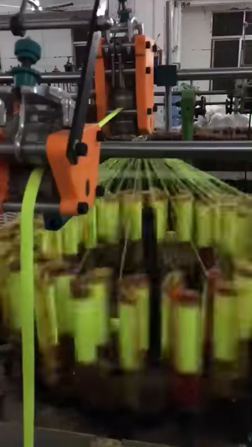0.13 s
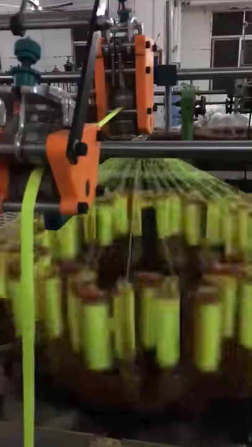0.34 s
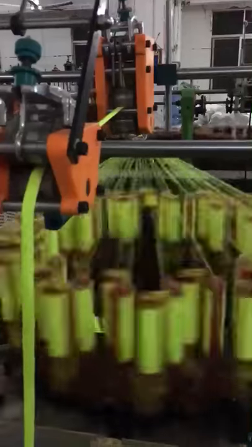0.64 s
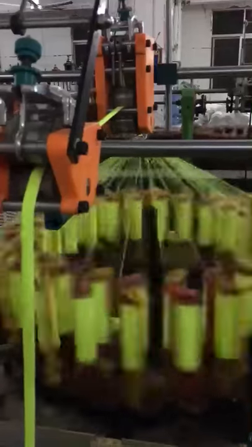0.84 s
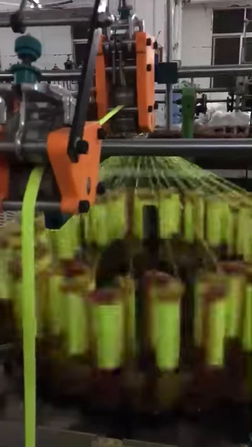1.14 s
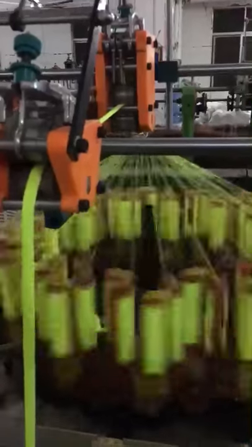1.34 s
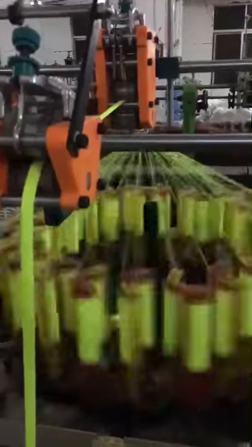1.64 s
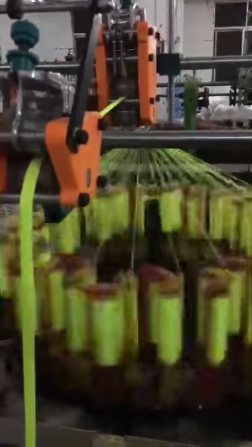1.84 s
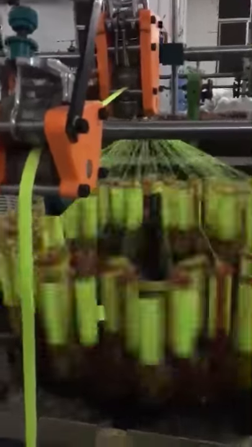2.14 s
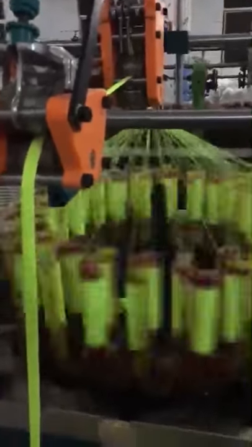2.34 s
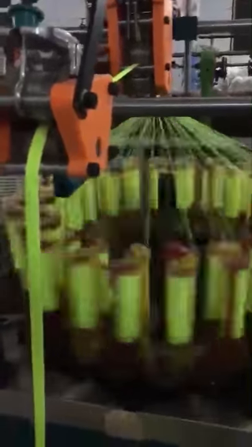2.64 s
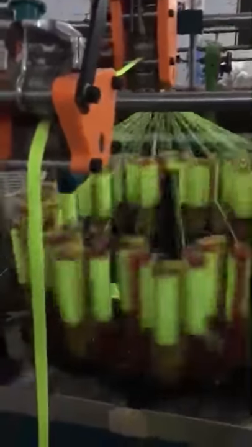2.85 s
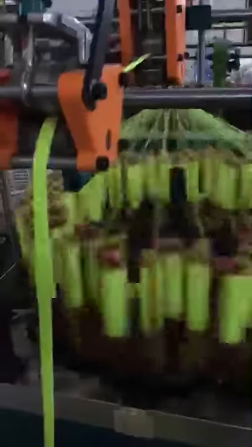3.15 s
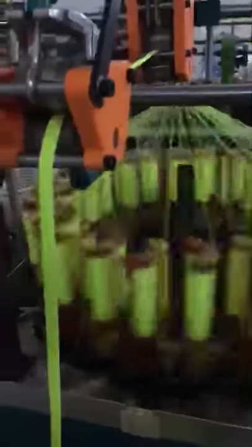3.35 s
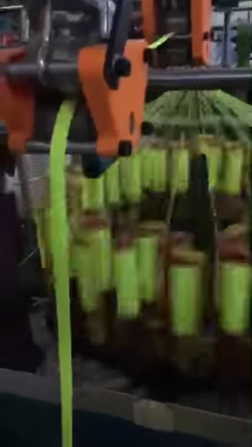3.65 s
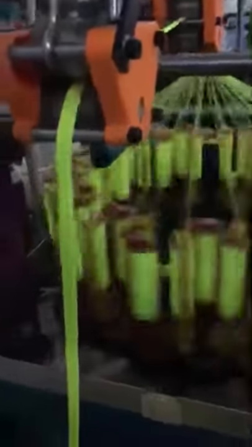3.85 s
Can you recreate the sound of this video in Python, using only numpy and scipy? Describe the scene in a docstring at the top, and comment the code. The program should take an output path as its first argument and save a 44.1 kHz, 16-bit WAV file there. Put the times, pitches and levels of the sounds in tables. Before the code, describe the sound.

A braiding machine runs close by in a reverberant factory hall. Silence until about 0.26 s, then the full roar cuts in at once and holds to the end near 4 s. Countless tiny steel knocks merge into bright, gritty clatter strongest in the upper mids, with fluttering thread hiss, low frame rumble, unevenly swelling drive hum and steady hall din. The treble is dull at the very top.

```python
"""A braiding machine at steady speed in a factory hall, heard from close by.
First a quarter second of silence; then everything cuts in at once and runs to the end.
Random knocks excite steel rings: bobbin carriers circling their track merge into a roar, spindles ring on.
Filtered noise gives the hiss of the threads, the rumble of the frame and the even din of the hall behind;
drifting sines give the hum of the drive and the swelling harmonics of its shaft."""
import sys
import numpy as np
from scipy import signal
from scipy.fft import rfft, irfft
from scipy.io import wavfile

SR = 44100
rng = np.random.default_rng(int(sys.argv[2]) if len(sys.argv) > 2 else 0)


def generate_wav(sig):
    """Save sig (samples, or channels by samples) to the path in sys.argv[1] as 16-bit PCM at SR."""
    pcm = np.round(np.clip(np.atleast_2d(sig).T, -1, 1) * 32767).astype(np.int16)
    wavfile.write(sys.argv[1], SR, pcm)


N = 176400  # samples, 4 s

# Spectrum of the struck steel track and carriers: (frequency [Hz], relative density [dB per Hz])
STEEL_SPECTRUM = [(200, -20), (400, -11.5), (800, -11), (1300, -8), (1800, -4), (2250, -3), (2620, -1),
                  (3200, -2.5), (4100, -4.5), (4500, -7.5), (4900, -13.5), (6000, -7), (7600, -14)]
# Force of the knocks as the load on the carriers varies: (time [s], relative level [dB])
LOAD_CURVE = [(0.3, -18), (0.32, -17), (0.85, -17.5), (0.88, -21.5), (0.95, -15), (0.96, -18.5),
              (2.16, -16.5), (2.38, -19), (2.41, -16.5), (2.44, -17.5), (3.93, -18), (3.95, -18.5)]
# Ringing modes of the spindles: (frequency [Hz], relative level [dB], decay by 60 dB [s])
SPINDLE_MODES = [(356.5, -6, .1), (402.4, -5, 0.13), (419.4, -8.5, 0.17), (1623, -5, 0.071),
                 (1780, -3.5, 0.064), (1888, 1, .06), (1960, -3, 0.061), (2115, -6, .06), (2390, -7.5, .04),
                 (2540, -1.5, 0.075), (2648, -1.5, 0.07), (2730, -4.5, .06), (5780, -13.5, 0.05)]
# Spectrum of the hiss of threads in their guides: (frequency [Hz], relative density [dB per Hz])
THREAD_SPECTRUM = [(2000, -33), (4700, -13.5), (5400, 0.5), (6100, -4), (6800, -0.5), (7600, -1.5)]
# Hiss of the threads, before its trim: (time [s], level [dB])
THREAD_CURVE = [(0.3, -23.5), (0.81, -21.5), (1.01, -32), (1.19, -25), (1.4, -27), (1.42, -34), (1.44, -21),
                (1.7, -24.5), (2.62, -22), (2.65, -35), (2.67, -25.5), (3.04, -28), (3.46, -22.5),
                (3.49, -28), (3.81, -22), (3.83, -33), (3.94, -17), (3.95, -22.5)]
# Spectrum of the rumbling frame: (frequency [Hz], relative density [dB per Hz])
RUMBLE_SPECTRUM = [(10, -9.5), (25, -8.5), (38, -10), (55, -3), (72, -2), (110, -2.5), (145, -2), (240, -8),
                   (380, -8), (520, -11.5), (700, -16), (1200, -30)]
# Hum of rotating parts of the drive and frame: (frequency [Hz], rms level [dB])
HUM_TONES = [(34.5, -41.5), (46.6, -42.5), (52, -36), (61, -34.5), (68, -40), (124, -40.5), (143, -41.5),
             (207, -43), (318, -47.5)]
# Second harmonic of the shaft, before its trim: (time [s], level [dB])
THROB_CURVE = [(0.3, -28.5), (0.64, -31), (1.11, -22), (1.15, -27), (1.21, -22), (2.02, -26.5), (2.06, -35),
               (2.22, -29), (2.92, -24.5), (3.0, -41), (3.09, -24), (3.95, -25.5)]
# Fourth harmonic of the shaft, before its trim: (time [s], level [dB])
GROWL_CURVE = [(0.3, -30), (0.93, -26), (1.04, -45), (1.24, -24), (1.3, -36.5), (1.84, -25.5),
               (2.23, -42.5), (2.55, -24.5), (2.91, -50), (3.08, -23), (3.81, -36), (3.95, -30.5)]
# Fifth harmonic of the shaft, before its trim: (time [s], level [dB])
BOOM_CURVE = [(0.3, -32), (0.33, -34), (0.46, -28), (1.31, -35), (1.61, -23), (1.66, -29), (2.08, -37),
              (2.13, -24.5), (2.64, -36.5), (2.67, -38), (2.89, -41), (3.0, -24.5), (3.31, -27.5),
              (3.38, -42), (3.77, -27), (3.95, -27)]
# Higher drone, before its trim: (time [s], level [dB])
DRONE_CURVE = [(0.3, -45), (0.6, -32), (0.71, -51), (0.87, -33), (2.51, -44), (2.63, -28.5), (2.8, -39.5),
               (3.83, -36), (3.89, -56), (3.95, -41)]
# Spectrum of the din of the hall: (frequency [Hz], relative density [dB per Hz])
DIN_SPECTRUM = [(100, -5.5), (450, -6), (750, -6), (1100, -5), (1800, -1.5), (2700, -2), (4100, -3.5),
                (4900, -10), (7600, -17)]

START_S, EDGE_HZ = .2555, 7580  # sound cuts in; upper edge of the band
CLATTER_DB, SPINDLE_DB, RUMBLE_DB, DIN_DB = -19, -27.5, -26, -19.5  # rms levels
THREAD_TRIM_DB, THROB_TRIM_DB, GROWL_TRIM_DB, BOOM_TRIM_DB, DRONE_TRIM_DB = -1, -1, -1, 0, -0.5
KNOCKS_PER_S, KNOCK_SPREAD_DB = 2800, 1.8  # all carriers together, and again all spindle modes
LOAD_FOLLOW = 0.74  # share of the load curve's dB that the knocks follow
ORBIT_S, ORBIT_DB = 1.194, 3  # one lap of the track; rise and fall between near and far side
PART_T60_S, PART_COLOUR_DB = 0.018, 3.5
HALL_T60_S, HALL_DB = 0.26, 1  # diffuse tail; its energy against the direct sound
SURGE_HZ, WAVER_HZ = 25, 4.2  # upper rates of the fast and slow wandering
SURGE_DB, THREAD_FLUTTER_DB, RUMBLE_SWELL_DB, HUM_WAVER_DB = 0.8, 4.5, 1.65, 2.5  # rms wandering
TONE_DRIFT_HZ = 0.53  # rms
SHAFT_HZ, DRONE_HZ = 20.72, 186  # turns of the shaft a second; pitch of the drone


def amp(db):
    """Turns dB into an amplitude factor."""
    return 10 ** (np.asarray(db) / 20)


def unit(x):
    """Scales to rms 1."""
    return x / np.sqrt(np.mean(x ** 2) + 1e-20)


def colour(x, spectrum):
    """Filters by (Hz, dB) points joined along log frequency, then scales to rms 1."""
    hz, db = np.transpose(spectrum)
    f = np.fft.rfftfreq(len(x), 1 / SR)
    gain = amp(np.interp(np.log(f + 1), np.log(hz), db))
    return unit(irfft(rfft(x) * gain, len(x)))


def coloured_noise(spectrum):
    """Steady noise of rms 1 with the given spectrum."""
    return colour(rng.standard_normal(N), spectrum)


def wander(top_hz):
    """Random slow variation of rms 1, falling away above the given rate."""
    f = np.fft.rfftfreq(N, 1 / SR)
    gain = (f > .5) / (1 + (f / top_hz) ** 4)
    return unit(irfft(rfft(rng.standard_normal(N)) * gain, N))


def level(curve):
    """Joins (s, dB) points into a level for every sample."""
    return np.interp(np.arange(N) / SR, *np.transpose(curve))


def tone(hz):
    """A sine of rms 1 whose pitch drifts slightly."""
    drifting_hz = hz + TONE_DRIFT_HZ * wander(WAVER_HZ)
    turns = np.cumsum(drifting_hz) / SR + rng.random()
    return unit(np.sin(2 * np.pi * turns))


def decay(t, t60):
    """Exponential decay, 60 dB down after t60 seconds."""
    return np.exp(-np.log(1000) * t / t60)


def knocks(per_s):
    """Impacts at random moments, of uneven force and either sign."""
    force = amp(KNOCK_SPREAD_DB * np.minimum(rng.exponential(1, N), 4))
    sign = rng.choice([-1., 1.], N)
    return force * sign * (rng.random(N) < per_s / SR)


def part_ring(size=2048, count=24):
    """A steel part's many close modes: decaying noise with a random colour of its own."""
    f = np.fft.rfftfreq(size, 1 / SR)
    tint = np.interp(f, np.linspace(0, EDGE_HZ, count), rng.standard_normal(count))
    ring = irfft(rfft(rng.standard_normal(size)) * amp(PART_COLOUR_DB * tint))
    return unit(ring * decay(np.arange(size) / SR, PART_T60_S))


def hall_echo(x):
    """The hall answers a short sound with a diffuse tail of decaying noise."""
    t = np.arange(SR // 3) / SR
    tail = rng.standard_normal(len(t)) * decay(t, HALL_T60_S)
    direct = t == 0
    return signal.fftconvolve(x, direct + amp(HALL_DB) * tail / np.linalg.norm(tail))


def carriers(load, count=48):
    """Each carrier knocks with its own ring and echo, louder as it circles past the near side."""
    t, clatter = np.arange(N) / SR, np.zeros(N)
    for k in range(count):
        lap = t / ORBIT_S + k / count
        nearness = amp(ORBIT_DB * np.cos(2 * np.pi * lap))
        strikes = knocks(KNOCKS_PER_S / count) * load * nearness
        clatter += signal.oaconvolve(strikes, hall_echo(part_ring()))[:N]
    return amp(CLATTER_DB) * colour(clatter, STEEL_SPECTRUM)


def spindles(load, size=8192):
    """Knocks keep the longer modes of the spindles ringing, each a decaying sine."""
    t, ringing = np.arange(size) / SR, np.zeros(N)
    for hz, db, t60 in SPINDLE_MODES:
        mode = np.sin(2 * np.pi * hz * t) * decay(t, t60)
        strikes = knocks(KNOCKS_PER_S / len(SPINDLE_MODES)) * load
        ringing += amp(db) * unit(signal.oaconvolve(strikes, mode)[:N])
    return amp(SPINDLE_DB) * unit(ringing)


def threads():
    """Threads rub through their guides and hiss unevenly as their tension changes."""
    flutter = amp(THREAD_FLUTTER_DB * wander(SURGE_HZ))
    hiss = unit(coloured_noise(THREAD_SPECTRUM) * flutter)
    return hiss * amp(level(THREAD_CURVE) + THREAD_TRIM_DB)


def frame_rumble():
    """The shaken frame gives a low noise that swells at random."""
    swell = amp(RUMBLE_SWELL_DB * wander(SURGE_HZ))
    return amp(RUMBLE_DB) * unit(coloured_noise(RUMBLE_SPECTRUM) * swell)


def drive_hum():
    """Rotating parts hum as sines that waver in pitch and level."""
    hum = np.zeros(N)
    for hz, db in HUM_TONES:
        waver = amp(HUM_WAVER_DB * wander(WAVER_HZ))
        hum += amp(db) * unit(tone(hz) * waver)
    return hum


def drive_shaft():
    """The turning shaft sounds at multiples of its rate, each swelling separately, under a higher drone."""
    throb = tone(2 * SHAFT_HZ) * amp(level(THROB_CURVE) + THROB_TRIM_DB)
    growl = tone(4 * SHAFT_HZ) * amp(level(GROWL_CURVE) + GROWL_TRIM_DB)
    boom = tone(5 * SHAFT_HZ) * amp(level(BOOM_CURVE) + BOOM_TRIM_DB)
    drone = tone(DRONE_HZ) * amp(level(DRONE_CURVE) + DRONE_TRIM_DB)
    return throb + growl + boom + drone


def hall_din():
    """The rest of the hall blends into steady noise."""
    return amp(DIN_DB) * coloured_noise(DIN_SPECTRUM)


def scene():
    """Carriers and spindles under one uneven load, with threads, frame, drive and hall."""
    load = unit(amp(LOAD_FOLLOW * level(LOAD_CURVE) + SURGE_DB * wander(SURGE_HZ)))
    machine = carriers(load) + spindles(load) + threads()
    machine += frame_rumble() + drive_hum() + drive_shaft()
    return (machine + hall_din())[None]


def record(dry):
    """At the microphone the sound cuts in abruptly, with the treble above the band edge removed."""
    on = np.arange(N) / SR >= START_S
    lowpass = signal.firwin(1501, EDGE_HZ, window=("kaiser", 9), fs=SR)
    return signal.oaconvolve(dry * on, lowpass[None], "same")


dry = scene()
out = record(dry)
generate_wav(out)
```